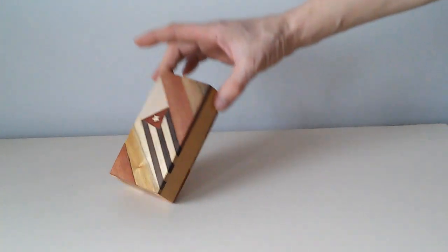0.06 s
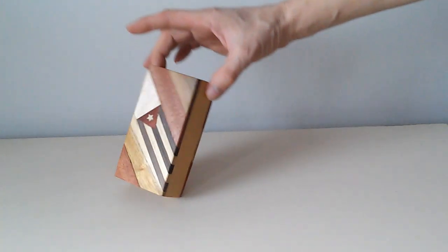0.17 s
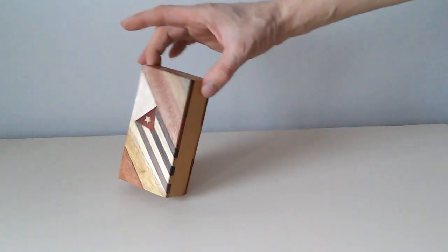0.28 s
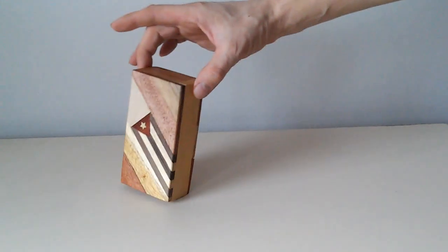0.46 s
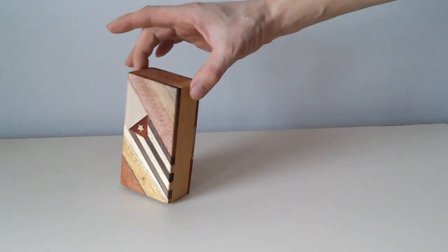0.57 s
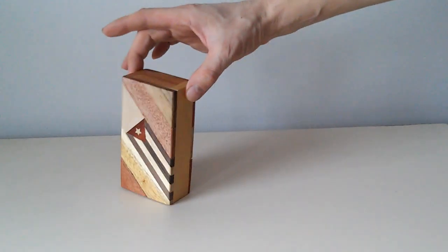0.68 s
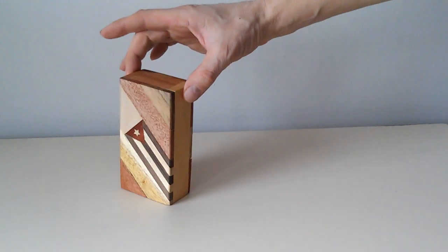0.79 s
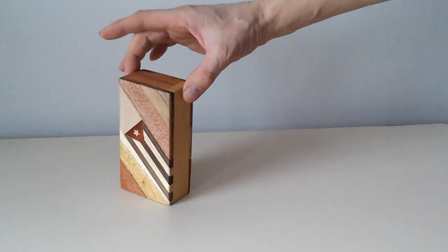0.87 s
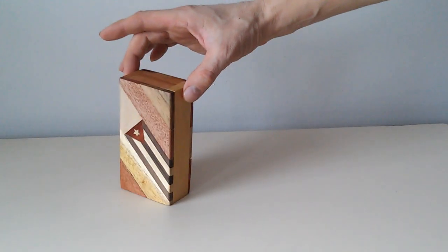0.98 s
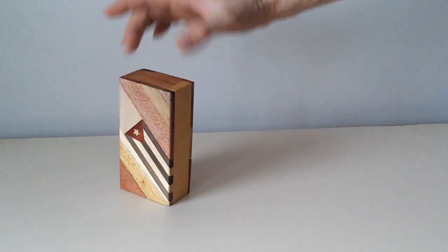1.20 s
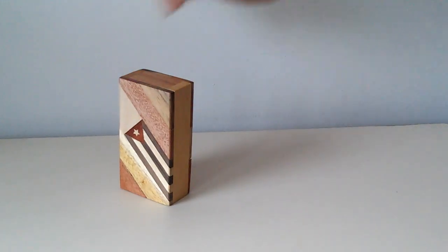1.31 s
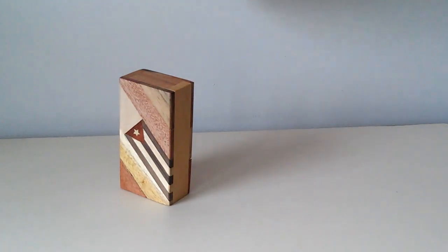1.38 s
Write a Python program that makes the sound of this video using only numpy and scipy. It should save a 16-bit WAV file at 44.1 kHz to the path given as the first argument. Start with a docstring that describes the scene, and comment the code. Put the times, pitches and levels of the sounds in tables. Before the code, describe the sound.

A small wooden box scrapes briefly on a table, with a soft judder.

```python
"""Over a soft background noise, a small wooden box is tilted upright on a table, close by.
First its bottom edge starts to drag in tiny slips that ring the hollow box, and the wood grain hisses.
Then the scrape grows into a rasp, with short judders and chirps where the edge catches.
As the weight comes down, the table top drones and its frame rumbles.
Last, the stroke dies away with a faint low hum from the table and a short echo from the room."""
import sys
import numpy as np
from scipy import signal
from scipy.fft import rfft, irfft
from scipy.io import wavfile
from scipy.ndimage import uniform_filter1d

SR = 44100
rng = np.random.default_rng(int(sys.argv[2]) if len(sys.argv) > 2 else 0)


def put_to_file(sound):
    """Save the sound as 16-bit audio at rate SR, in the file named by the first command-line argument."""
    columns = np.atleast_2d(sound).T  # one column per channel
    safe = np.clip(columns, -1, 1)
    whole_steps = np.round(safe * 32767)
    wavfile.write(sys.argv[1], SR, whole_steps.astype(np.int16))


N = 63945  # samples: 1.45 s


def amp(db):
    """Turns decibels into a number to multiply by."""
    return 10 ** (np.asarray(db) / 20)


def unit(x):
    """Scales x to an average strength (rms) of 1."""
    return x / np.sqrt(np.mean(x ** 2) + 1e-20)


def curve(points, column=1):
    """Joins the points of a time table with straight lines, giving a value at every sample."""
    rows = np.array(points)
    return np.interp(np.arange(N) / SR, rows[:, 0], rows[:, column])


def at_frequency(points, hz):
    """Looks up hz in a frequency table, blending between its rows."""
    f, value = np.transpose(points)
    return np.interp(np.log(hz + 1), np.log(f), value)


def colour(x, spectrum):
    """Shapes the lows and highs of x, at strength 1."""
    gain = amp(at_frequency(spectrum, np.fft.rfftfreq(N, 1 / SR)))
    return unit(irfft(rfft(x) * gain, N))


def brighten(x, hz, treble_db):
    """Turns the part of x above hz up or down."""
    dull = signal.sosfiltfilt(signal.butter(2, hz, fs=SR, output="sos"), x)
    return dull + amp(treble_db) * (x - dull)


def steady(x, span_s):
    """Evens out swells longer than span_s: rubbing both feeds and calms the wood."""
    size = max(int(span_s * SR), 8)
    power = uniform_filter1d(uniform_filter1d(x ** 2, size), size)
    return x / np.sqrt(abs(power) + 1e-12)


def ring(slips, tones, span_s):
    """Slips keep the wood's own tones ringing. A fade is the time a tone takes to drop 60 dB."""
    t = np.arange(SR // 3) / SR
    out = np.zeros(N)
    for hz, db, fade_s in tones:
        ping = amp(-60 * t / fade_s) * np.sin(2 * np.pi * hz * t)
        ringing = irfft(rfft(slips) * rfft(ping, N), N)  # one ping for every slip
        out += amp(db) * steady(ringing, span_s)
    return unit(out)


# Lows and highs of the soft background noise (f/Hz, level/dB)
BACKGROUND_COLOUR = [(20, -4), (38, -4), (52, 1), (70, -5), (100, -6), (140, -3), (220, -8), (450, -12),
                     (1000, -15.5), (2000, -17.5), (5000, -20), (11500, -18), (15500, -17.5)]
def background_hiss(level_db=-73.7, flicker_db=.9, flicker_s=.003):
    """A soft, even background noise whose treble flickers faintly."""
    flicker = unit(uniform_filter1d(rng.standard_normal(N), int(flicker_s * SR)))
    noise = colour(rng.standard_normal(N), BACKGROUND_COLOUR)
    return amp(level_db) * brighten(noise, hz=785, treble_db=flicker_db * flicker)


# How long the room's echo takes to drop 60 dB (f/Hz, fade/s)
ECHO_FADE = [(150, 0.067), (500, 0.3), (2000, 0.33), (10000, 0.23)]
def room_echo(x, level_db=-13.5):
    """The room adds a short, blurred tail; lows and highs die at their own speeds."""
    hz, t, bands = signal.stft(rng.standard_normal(SR // 2), SR, nperseg=256)
    fade = amp(-60 * t / at_frequency(ECHO_FADE, hz)[:, None])
    tail = signal.istft(bands * fade, SR, nperseg=256)[1]
    tail[:SR // 200] = 0  # the echo starts 5 ms late
    return amp(level_db) * signal.fftconvolve(x, tail / np.linalg.norm(tail))[:N]


# How the frame's rumble swells and fades (t/s, level/dB)
RUMBLE_SWELL = [(.15, -90), (.27, -70), (.42, -64), (.5, -61), (.62, -70), (.72, -100)]
# Lows and highs of that rumble (f/Hz, level/dB)
RUMBLE_COLOUR = [(20, -10), (36, -4), (52, 2.5), (75, -6.5), (110, -11), (300, -59)]
def frame_rumble():
    """The table's frame rumbles as it takes the weight of the box."""
    noise = colour(rng.standard_normal(N), RUMBLE_COLOUR)
    return amp(curve(RUMBLE_SWELL)) * steady(noise, span_s=.04)


# How the grain's hiss swells and fades (t/s, level/dB)
HISS_SWELL = [(0, -107), (.075, -81.5), (.1, -67.5), (.2, -60.5), (.31, -53.5), (.37, -54.5), (.45, -56.5),
              (.52, -63.5), (.59, -70.5), (.68, -75), (.8, -99)]
# Lows and highs of that hiss (f/Hz, level/dB)
HISS_COLOUR = [(1000, -8), (4000, -5.5), (6000, -10), (8000, -5), (11500, -2.5), (13500, -7), (15700, -11)]
def grain_hiss(slips, grit=0.49, flicker_db=0.84):
    """Wood fibres catch unevenly on the table and make a fine, dry hiss."""
    flicker = unit(uniform_filter1d(rng.standard_normal(N), size=300))
    hiss = colour(rng.standard_normal(N) + grit * slips, HISS_COLOUR)
    return amp(curve(HISS_SWELL) + flicker_db * flicker) * hiss


# Short runs in which the edge judders (t/s, length/s, rate/Hz, level/dB)
JUDDER_RUNS = [(.153, .042, 158, -35.5), (.2915, .039, 168, -31.5), (.406, .023, 157, -21),
               (.470, .043, 105, -31), (0.5388, .016, 155, -35), (.6135, .015, 170, -49)]
def judder_pushes(jitter_s=0.00042):
    """The edge sticks and lets go in a nearly even beat, giving one push each time."""
    pushes = np.zeros(N)
    for start, length, rate, db in JUDDER_RUNS:
        times = np.arange(start, start + length, 1 / rate)
        jitter = jitter_s * rng.standard_normal(size=32)[:len(times)]
        pushes[np.round((times + jitter) * SR).astype(int)] = amp(db)
    return pushes


def judder_knocks(pushes, hz=216.8, decay_s=0.0072):
    """Each push gives the table a dull knock."""
    t = np.arange(SR // 20) / SR
    knock = -np.sin(2 * np.pi * hz * t) * t * amp(-60 * t / decay_s)
    return signal.fftconvolve(pushes, knock / abs(knock).max())[:N]


def edge_slips(pushes, per_s=2200, spread_db=2.5, boost_db=5, boost_s=0.0018):
    """The edge drags in tiny random slips, some larger than others, and stronger after each push."""
    size = amp(spread_db * np.minimum(rng.exponential(1, N), 4))
    age = np.arange(SR // 50) / SR / boost_s
    boost = signal.fftconvolve(pushes > 0, age * np.exp(1 - age))[:N]
    direction = rng.choice([-1., 1.], N)
    slipping = rng.random(N) < per_s / SR
    return steady(unit(amp(boost_db * boost) * size * direction * slipping), span_s=0.041)


# Moments when the edge catches and one wooden tone sings (t/s, length/s, f/Hz, level/dB)
EDGE_CATCHES = [(.072, .046, 1153, -56), (.12, .04, 1905, -52), (.124, .03, 2420, -60),
                (.136, .04, 1153, -49), (.176, .024, 1755, -53), (.272, .008, 1905, -45),
                (.3, .045, 1755, -43), (.35, .045, 785, -37), (.39, .05, 156, -35.5),
                (.422, .018, 1755, -43), (.455, .064, 156, -39), (.7, .055, 156, -69), (.81, .15, 156, -80)]
def edge_catches(slips):
    """Brief chirps and low thuds: the edge locks on to one tone of the box or table, then lets go."""
    t, out = np.arange(N) / SR, np.zeros(N)
    for start, length, hz, db in EDGE_CATCHES:
        nearest_tone = min(BOX_TONES + TABLE_TONES, key=lambda row: abs(row[0] - hz))
        swell = np.sin(np.pi * np.clip((t - start) / length, 0, 1))
        out += amp(db) * swell * ring(slips, [nearest_tone], span_s=0.0047)
    return out


# The tilting stroke (t/s, rub level/dB, push level/dB, rasp level/dB)
TILT_STROKE = [(0, -64, -61, -88), (.03, -60.5, -66.5, -70), (.065, -52, -51, -84), (.105, -44, -58.5, -65),
               (.14, -42.5, -69, -52), (.185, -39.5, -42, -51), (.25, -38.5, -38, -46),
               (.305, -36, -43, -44.5), (.37, -36.5, -35, -43), (.42, -36.5, -39.5, -45.5),
               (.45, -38.5, -33.5, -47), (.505, -54, -40.5, -56.5), (.52, -44.5, -51, -61),
               (.555, -55, -55, -67), (.59, -61.5, -55.5, -71), (.625, -80, -66.5, -77),
               (.645, -78.5, -67, -80), (.73, -79, -74, -81), (.78, -100, -86, -100),
               (1.0, -110, -105, -110)]
def stroke_levels():
    """How strongly the box rubs, pushes into the table and rasps at each moment."""
    return [curve(TILT_STROKE, column) for column in (1, 2, 3)]


# Lows and highs of the fast-moving edge's rasp (f/Hz, level/dB)
RASP_COLOUR = [(600, -14.5), (1000, -5), (1450, -2.5), (1600, -14), (1730, 1), (2000, 1.5), (2300, -5),
               (2850, -5), (3400, -5), (4200, -9.5), (5500, -15), (9000, -49)]
def edge_rasp(slips, rasp_db, fade_s=0.055, ring_share=0.8, full_db=-41.5):
    """Fast slips rattle the box's many close high tones; more speed sounds brighter."""
    t = np.arange(SR // 8) / SR
    panels = rng.standard_normal(len(t)) * amp(-60 * t / fade_s)
    ringing = unit(signal.fftconvolve(slips, panels)[:N])
    rattle = steady(colour(slips + ring_share * ringing, RASP_COLOUR), span_s=0.0053)
    treble_db = 2.5 * np.clip(rasp_db - full_db, -12, 3)
    return amp(rasp_db) * brighten(rattle, hz=2716, treble_db=treble_db)


# The table top's own tones (f/Hz, level/dB, fade/s)
TABLE_TONES = [(156, -1, .55), (183, -4.5, .35), (257.5, 0, .5), (284, -2, .4), (310, -7, .25),
               (388, -10, .3), (484, -5.5, .45), (527, -7, .4), (562, -10, .3), (608, -8, .3),
               (631, -5.5, .35), (710, -9, .3), (737, -8, .35), (785, -.5, .5)]
def table_drone(slips, push_db, gain_db=1.5, full_db=-44.5):
    """The table top drones under the dragging edge; a light push moves mostly its low tones."""
    tones = ring(slips, TABLE_TONES, span_s=.035)
    drone = brighten(tones, hz=332, treble_db=0.4 * np.minimum(push_db - full_db, 0))
    return amp(gain_db + push_db) * steady(drone, span_s=0.025)


# The hollow box's own tones (f/Hz, level/dB, fade/s)
BOX_TONES = [(337, 6, .1), (660, -10.5, .06), (835, -6.5, .05), (1035, -19, .03), (1153, -12.5, .05),
             (1275, -21, .04), (1755, -11, .05), (1905, -14.5, .035), (2270, -23, .06), (2420, -27, .04),
             (2620, -26, .05), (3265, -27, .05)]
# Lows and highs of the edge's toneless scrape (f/Hz, level/dB)
SCRAPE_COLOUR = [(100, -28.5), (140, -27), (300, -4), (400, -2.5), (480, 2), (820, 2.5), (960, -3),
                 (1400, -13.5), (2500, -25), (5000, -49.5)]
def box_scrape(slips, rub_db, full_db=-37):
    """A light rub mostly rings the hollow box; a hard one scrapes more and sounds brighter."""
    force_db = np.clip(rub_db - full_db, -14, 4)
    scrape = amp(0.8 * force_db - 1.5) * steady(colour(slips, SCRAPE_COLOUR), span_s=0.019)
    wood = ring(slips, BOX_TONES, span_s=0.0184) + scrape
    return amp(rub_db) * brighten(wood, hz=508, treble_db=0.6 * force_db)


def thin_bass(x, cut_hz=133.5, leak_db=-25.5):
    """Small wooden panels give off almost no sound below their lowest tone."""
    hz = np.fft.rfftfreq(2 * N, 1 / SR)
    leak = amp(leak_db)
    gain = leak + (1 - leak) / (1 + (cut_hz / (hz + 1)) ** 20)
    return irfft(rfft(x, 2 * N) * gain)[:N]


def scene():
    """One tilt of the box on the table, with the room's echo, over a soft background noise."""
    rub_db, push_db, rasp_db = stroke_levels()
    pushes = judder_pushes()
    slips = edge_slips(pushes)
    wood = box_scrape(slips, rub_db) + table_drone(slips, push_db)
    edge = edge_rasp(slips, rasp_db) + grain_hiss(slips) + edge_catches(slips) + judder_knocks(pushes)
    near = thin_bass(wood + edge)
    return (near + room_echo(near) + frame_rumble() + background_hiss())[None]


def record(dry):
    """Cuts away the very highest treble."""
    treble_cut = signal.firwin(801, cutoff=15700, window=("kaiser", 9), fs=SR)
    return signal.oaconvolve(dry, treble_cut[None], "same")


dry = scene()
out = record(dry)
put_to_file(out)
```